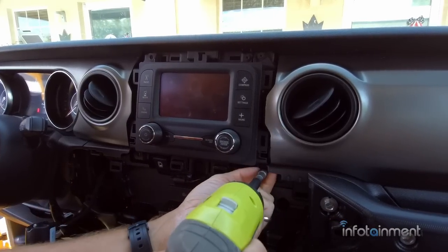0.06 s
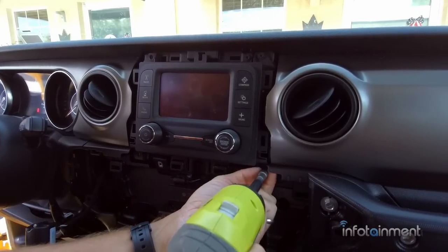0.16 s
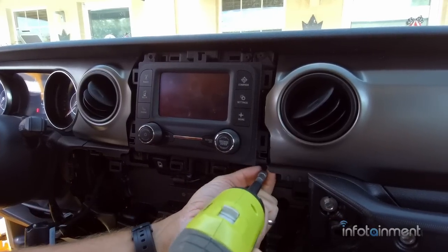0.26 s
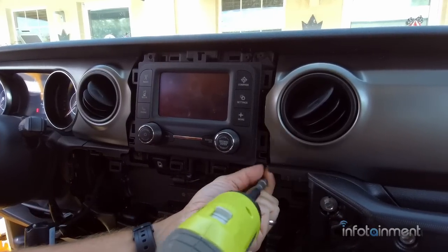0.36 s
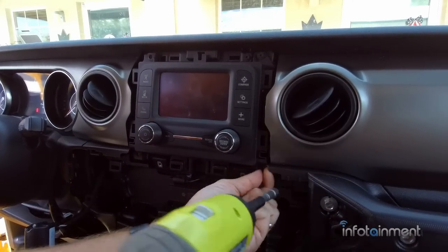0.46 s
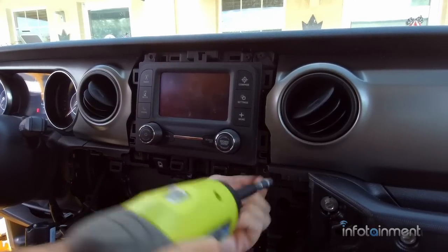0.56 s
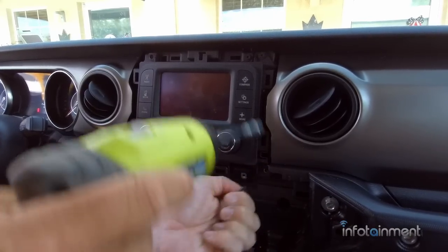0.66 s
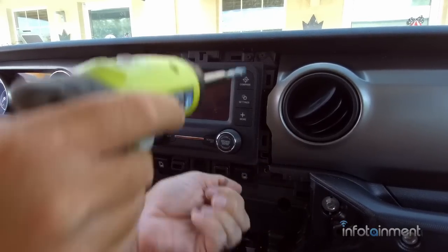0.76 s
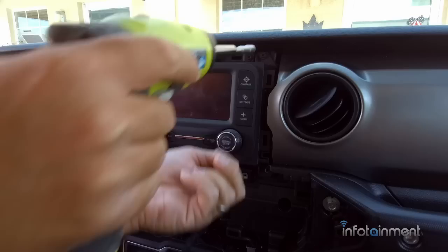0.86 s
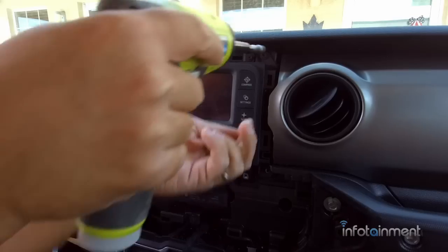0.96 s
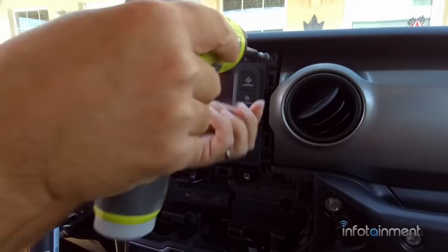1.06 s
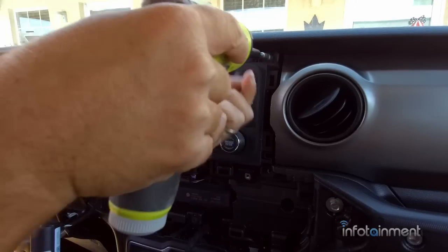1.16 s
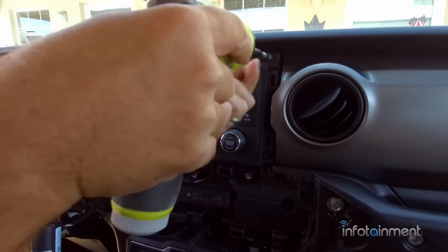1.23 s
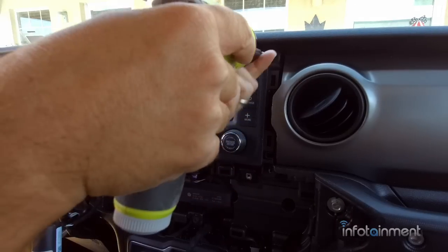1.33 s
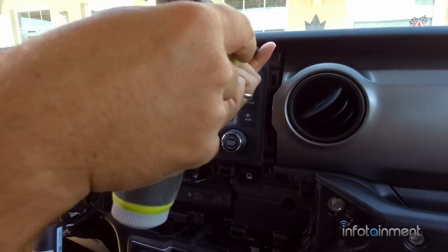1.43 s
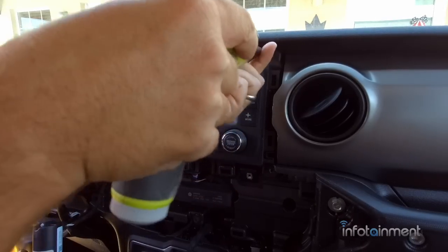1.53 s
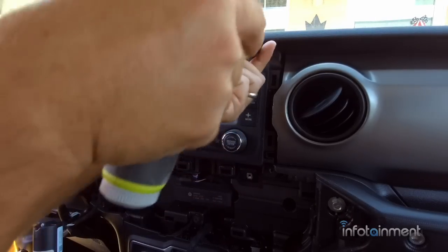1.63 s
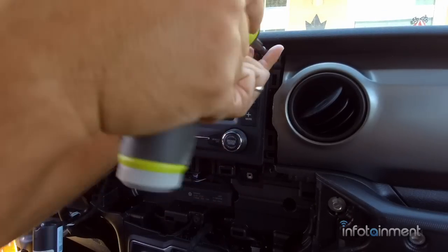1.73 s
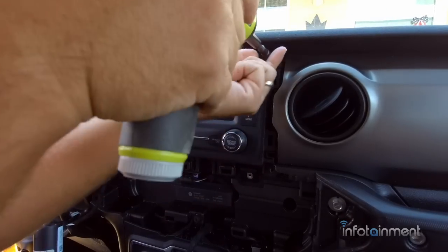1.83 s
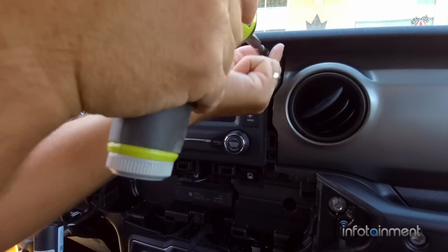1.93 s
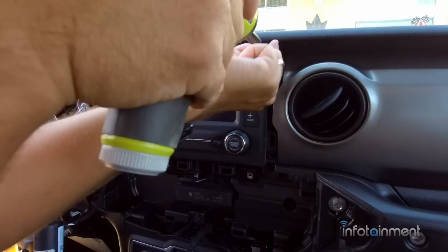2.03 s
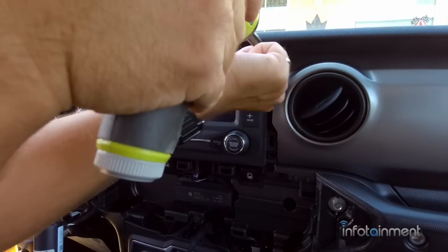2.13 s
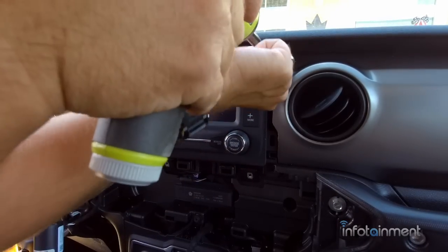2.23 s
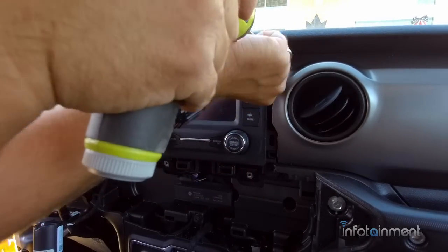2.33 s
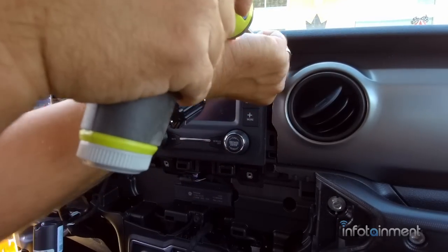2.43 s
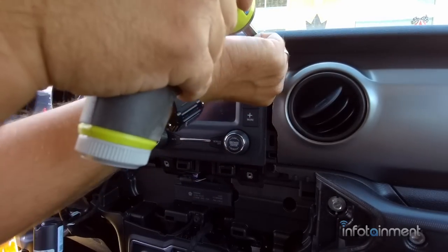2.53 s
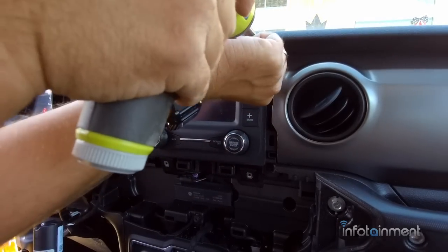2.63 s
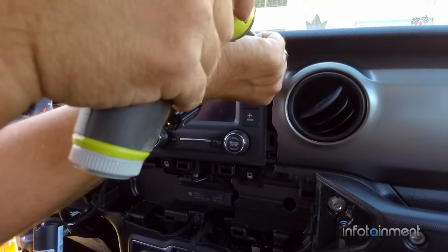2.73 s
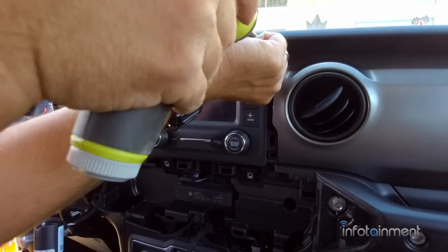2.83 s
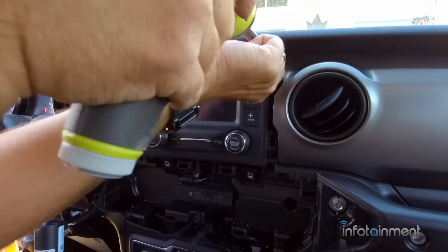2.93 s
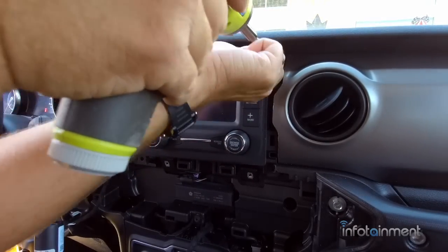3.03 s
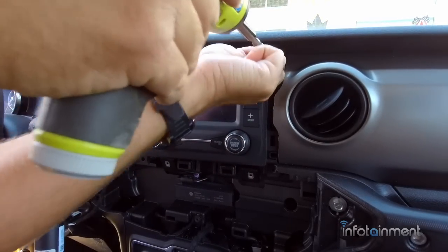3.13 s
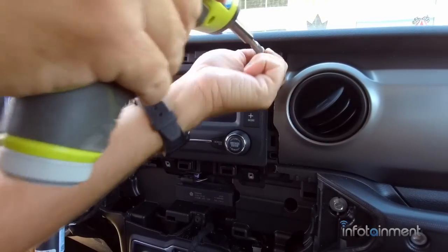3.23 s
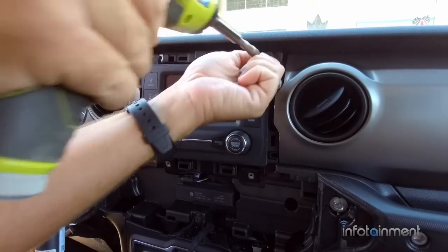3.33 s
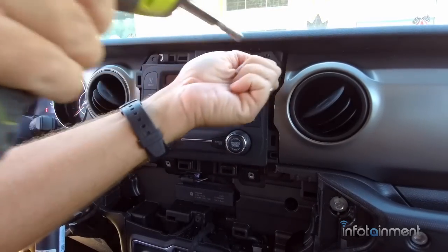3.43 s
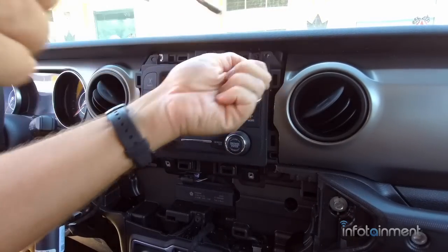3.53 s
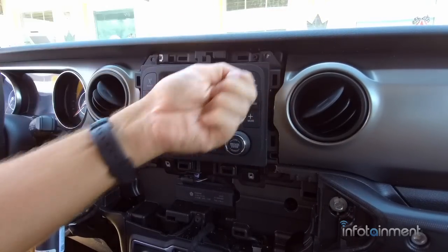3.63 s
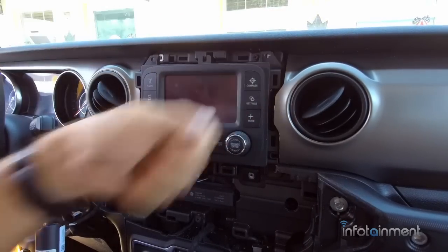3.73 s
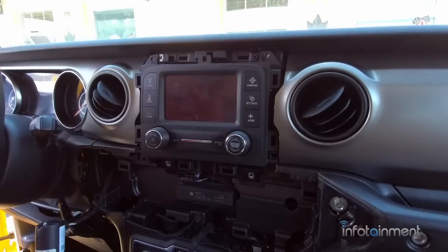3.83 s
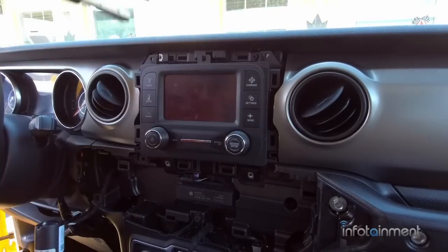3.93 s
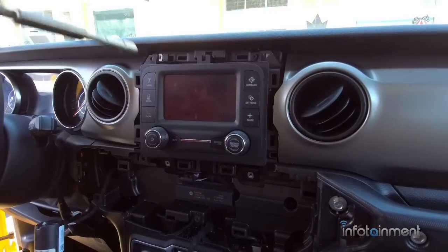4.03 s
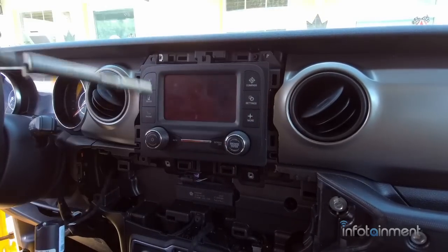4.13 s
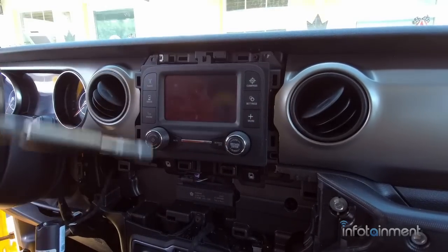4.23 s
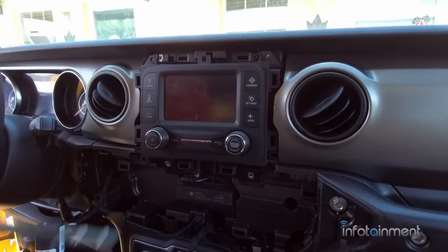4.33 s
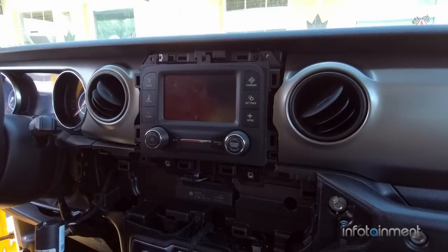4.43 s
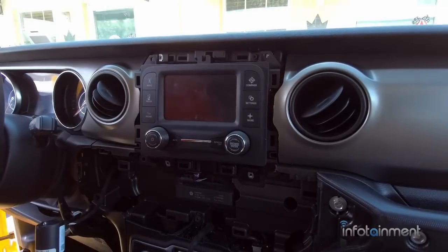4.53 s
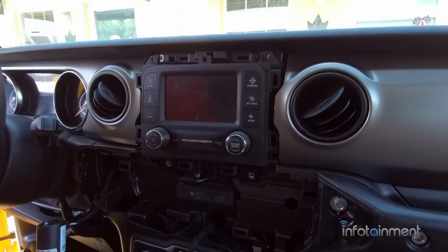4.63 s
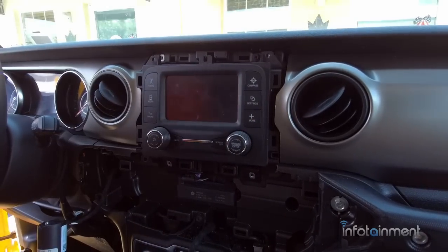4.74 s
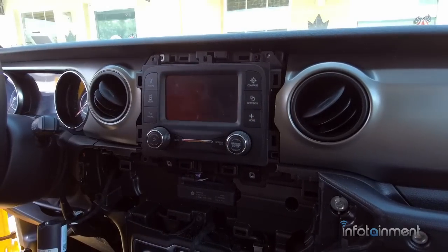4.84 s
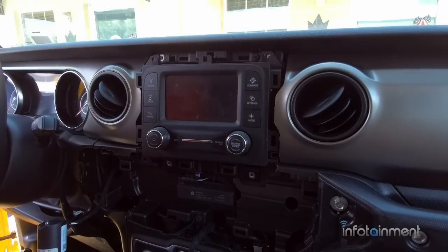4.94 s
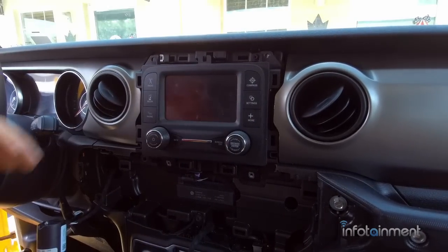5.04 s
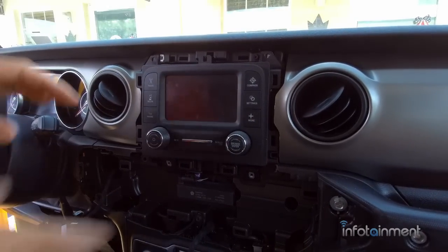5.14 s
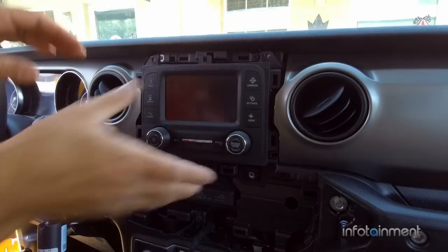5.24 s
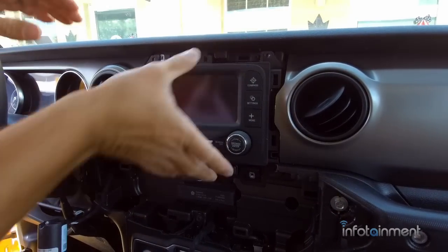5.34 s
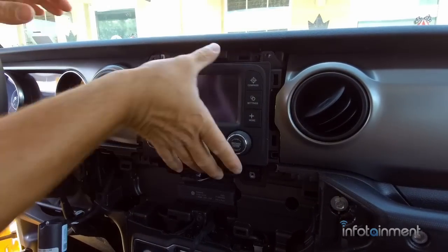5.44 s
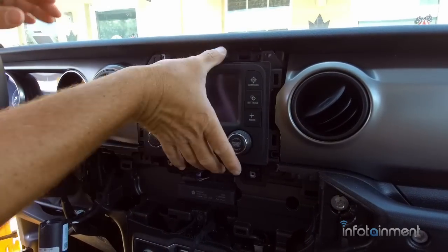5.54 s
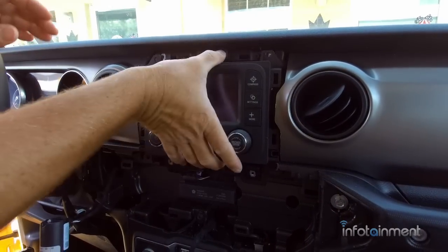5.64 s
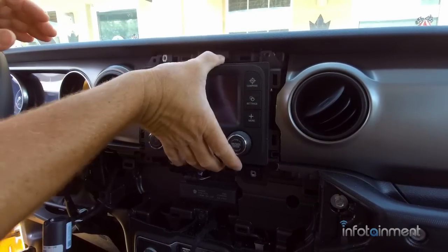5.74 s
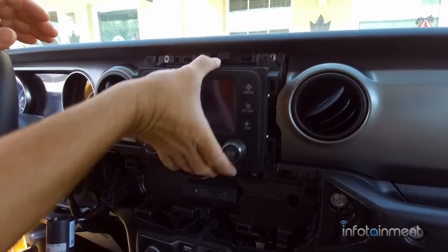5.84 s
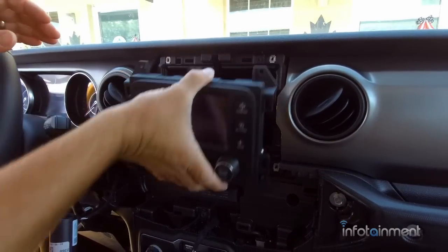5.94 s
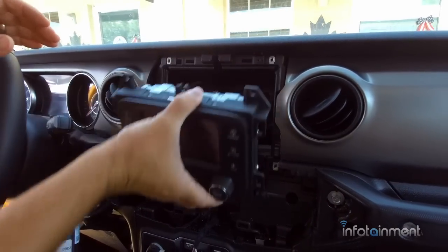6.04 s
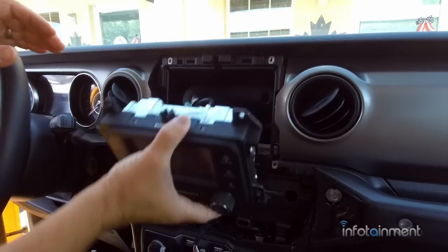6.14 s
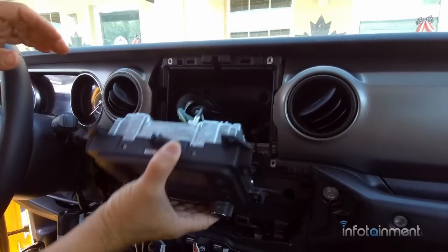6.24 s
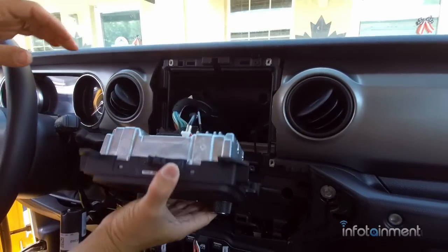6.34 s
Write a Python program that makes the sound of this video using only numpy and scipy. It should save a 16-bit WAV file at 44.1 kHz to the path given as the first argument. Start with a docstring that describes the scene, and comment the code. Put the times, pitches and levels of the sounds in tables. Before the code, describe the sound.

Inside a small, dry car cabin with faint ventilation hum, a cordless screwdriver is already whirring, then coasts down. Gritty taps and sharp plastic clacks follow. A second run backs out a screw and winds down. Tiny screw ticks, then the tool thumps loudly into a hollow console and rattles. Soft friction and small clicks close it. One close microphone, left channel only.

```python
"""In a small, dead car cabin the ventilation hums: filtered noise with a few wavering tones.
A cordless screwdriver whirrs once held free, then backs a screw out of the dashboard: uneven gear knocks and a
thin whine follow the motor speed and coast down each time. Gritty bursts of taps chatter, and the bit clacks.
The tool drops into the console with hollow thumps and rattling noise bursts; tiny ticks of screws and
soft strokes of friction join in as hands ease the radio out. One microphone feeds the left channel only."""
import sys
import numpy as np
from scipy import signal
from scipy.fft import rfft, irfft
from scipy.io import wavfile

SR = 44100
rng = np.random.default_rng(int(sys.argv[2]) if len(sys.argv) > 2 else 0)


def put_to_file(sound):
    """Save the sound as 16-bit audio at rate SR, in the file named by the first command-line argument."""
    columns = np.atleast_2d(sound).T  # one column per channel
    safe = np.clip(columns, -1, 1)
    whole_steps = np.round(safe * 32767)
    wavfile.write(sys.argv[1], SR, whole_steps.astype(np.int16))


N = 281799  # length in samples
T = np.arange(N) / SR  # time in s


def amp(db):
    """Decibels to gain."""
    return 10 ** (np.asarray(db) / 20)


def unit(x):
    """Scales to rms 1."""
    return x / np.sqrt(np.mean(x ** 2) + 1e-20)


def add(mix, start_s, sound):
    """Mixes a sound in at start_s."""
    part = mix[max(round(start_s * SR), 0):][:len(sound)]
    part += sound[:len(part)]


def drift(count, rate_hz):
    """Slow random wander of rms 1: noise that fades out above about rate_hz."""
    hz = np.fft.rfftfreq(count, 1 / SR)
    spectrum = rfft(rng.standard_normal(count)) * np.exp(-(hz / rate_hz) ** 2)
    return unit(irfft(spectrum, count))


def swells(rows, t):
    """The gain of smooth bell-shaped swells, one a row."""
    return sum(amp(db) * np.exp(-((t - middle) / half) ** 2) for middle, half, db in rows)


def colour_db(points, peaks, hz):
    """A broad spectrum with resonances standing on it."""
    point_hz, point_db = np.transpose(points)
    broad_db = np.interp(np.log(hz + 1), np.log(point_hz + 1), point_db)
    bumps = np.zeros_like(hz)
    for centre, width, level_db in peaks:
        bumps += amp(level_db) / (1 + (2 * (hz - centre) / width) ** 2)
    return broad_db + 20 * np.log10(1 + bumps)


def ring(x, points, peaks=(), bass_db=0, treble_db=0, size=4096):
    """Passes x through a causal body response, with shelves for bass and treble."""
    hz = abs(np.fft.fftfreq(size, 1 / SR))
    bass_shelf = bass_db / (1 + (hz / 600) ** 3)
    treble_shelf = treble_db * hz ** 3 / (hz ** 3 + 4500 ** 3)
    db = colour_db(points, peaks, hz) + bass_shelf + treble_shelf
    log_gain = np.log(amp(np.maximum(db, -100)))
    # minimum phase: the body answers at once and never before the blow
    response = np.fft.ifft(np.exp(np.conj(signal.hilbert(log_gain)))).real
    return signal.oaconvolve(x, response[:size // 2])[:len(x)]


def contact(level_db, t60, bass_db, treble_db, colour, peaks, rise, crack_db, tail_db, tail_t60, size=9000):
    """A crack, a dense scatter from nearby panels and a faint cabin tail; times in s."""
    t = np.arange(size) / SR
    scatter = amp(-60 * t / t60)
    crack = amp(crack_db) * np.exp(-t / 0.0012)
    tail = amp(tail_db - 60 * t / tail_t60)
    envelope = (scatter + crack + tail) * (1 - np.exp(-t / rise))
    hit = ring(envelope * rng.standard_normal(size), colour, peaks, bass_db, treble_db)
    return amp(level_db) * hit / np.sqrt(np.sum(hit ** 2) / (0.0097 * SR))  # energy as if held for 9.7 ms


# colour of the rushing air: pitch_hz, density_db (dB per Hz)
AIR_COLOUR = [(15, -10), (25, -37), (53, -32), (197, -17), (225, -6), (272, -16.5), (311, -8.5),
              (356, -11.5), (465, -5), (754, -6), (1780, -14), (2390, -18.5), (2660, -20.5), (9630, -29),
              (15200, -34.5)]
# tones of the blower and its duct: pitch_hz, width_hz, level_db (rms)
BLOWER_TONES = [(245, 13, -73.5), (444, 14, -74), (555, 35, -72), (680, 15, -76.5), (4620, 1000, -79.5)]


def ventilation(air_db=-59.15, swell_db=1.4):
    """A soft rush of air with a few tones, each wavering in level and phase."""
    air = unit(ring(rng.standard_normal(N), AIR_COLOUR, size=8192))
    out = air * amp(air_db + swell_db * drift(N, 11))
    for hz, width, level_db in BLOWER_TONES:
        phase = 2 * np.pi * hz * T
        wavering = drift(N, width / 2) * np.cos(phase) + drift(N, width / 2) * np.sin(phase)
        out += amp(level_db) * wavering
    return out


def cabin_boom(x, hz=66, width=20, gain_db=4.0):
    """Blows on the dashboard stir the lowest air mode of the cabin."""
    band = [hz - width / 2, hz + width / 2]
    return amp(gain_db) * signal.sosfilt(signal.butter(2, band, "band", fs=SR, output="sos"), x)


# strokes of hand and tool over plastic: middle_s, half_length_s, level_db
STROKES = [(1.385, 0.015, -60.5), (1.462, 0.0072, -54), (1.538, 0.013, -49.5), (3.62, 0.029, -62),
           (3.92, 0.019, -61), (4.61, 0.033, -54.5), (4.82, 0.25, -56), (5.14, 0.072, -67),
           (5.755, 0.033, -58), (6.05, 0.25, -66)]
# colour of that friction: pitch_hz, density_db (dB per Hz)
SLIDE_COLOUR = [(150, -41), (400, 4.5), (1100, -1), (2200, -1), (3500, -6), (6000, -10.5), (9000, -14),
                (15000, -19)]


def sliding(grain_db=2.0):
    """Fine, slightly uneven friction that swells and fades with each stroke."""
    grains = rng.standard_normal(N) * amp(grain_db * drift(N, 270))
    return unit(ring(grains, SLIDE_COLOUR)) * swells(STROKES, T)


# loose screws being handled: start_s, level_db, ring_hz
TICKS = [(1.06, -57.5, 13000), (1.741, -56, 2300), (3.155, -58, 6500), (3.389, -62.5, 5400),
         (4.022, -56.5, 7060), (4.053, -57, 6850), (4.126, -58, 7240), (4.213, -56.5, 4870),
         (4.267, -58, 7000), (4.288, -53, 4760)]
# colour of hard contacts, for ticks, chatter and clacks: pitch_hz, density_db (dB per Hz)
CLACK_COLOUR = [(35, -31), (60, -29), (383, -4.5), (622, -5), (1040, -3), (1500, -1), (2740, -7),
                (3080, -6), (4560, -13), (8720, -21.5), (9570, -26), (15200, -22.5)]


def ticks(t60=0.05, bass_db=-6, treble_db=30, ring_width=700, ring_db=4):
    """Small steel parts touch: short and nearly all treble."""
    out = np.zeros(N)
    for start_s, level_db, hz in TICKS:
        tick = contact(level_db, t60, bass_db, treble_db, CLACK_COLOUR, [(hz, ring_width, ring_db)],
                       rise=0.0005, crack_db=-1, tail_db=-38, tail_t60=0.112)
        add(out, start_s, tick)
    return out


# the rubber grip bouncing in the console: start_s (of the blow's centre), level_db, pitch_hz
THUMPS = [(4.1595, -34.5, 706), (4.2655, -36.5, 810), (4.3555, -22.5, 846), (4.3632, -9, 900),
          (4.379, -6.5, 910), (4.4188, -11.5, 880), (4.4326, -9.5, 960), (4.4555, -25.5, 910),
          (4.495, -34, 865), (4.513, -34.5, 794), (4.546, -32.5, 870), (4.570, -32.5, 880),
          (4.62, -39, 800)]
# echoes off the console walls: delay_s, level_db (over the blow)
WALLS = [(.0053, -9.5), (.0099, -13), (0.0154, -17.5)]
# modes of the console: pitch_hz, level_db (over the blow), t60_s
CONSOLE_MODES = [(240, -47.5, 0.29), (336, -38.5, 0.23), (423, -34, 0.29), (687, -30, 0.32),
                 (772, -15, 0.083), (920, -41, 0.14), (900, -31, 0.11), (1079, -26.5, 0.27),
                 (1565, -24, 0.049)]


def console(swell_s=0.00099, lead_s=0.0035, size=14000):
    """A soft blow is a few cycles of hollow tone, thrown back by the walls, leaving the modes ringing."""
    t = np.arange(size) / SR - lead_s
    after = np.maximum(t, 0)
    out = np.zeros(N)
    for start_s, level_db, hz in THUMPS:
        thump = np.zeros(size)
        for f, mode_db, t60 in CONSOLE_MODES:
            thump += amp(mode_db - 60 * after / t60) * np.sin(2 * np.pi * (f * after + rng.random()))
        thump *= 1 - np.exp(-after / 0.0018)  # the modes build up over a few ms
        for delay, wall_db in [(0.00031, 0)] + WALLS:  # the blow itself, then its echoes
            bell = np.exp(-0.5 * ((t - delay) / swell_s) ** 2)
            thump += amp(wall_db) * bell * np.cos(2 * np.pi * hz * (t - delay))
        add(out, start_s - lead_s, amp(level_db) * thump)
    return out


# the tool's shell landing: start_s, level_db
RATTLES = [(4.3263, -29.5), (4.338, -42.5), (4.3528, -29), (4.363, -34.5), (4.3787, -31), (4.416, -41.5),
           (4.425, -37), (4.4482, -40.5), (4.469, -47.5), (4.4934, -44.5), (4.5441, -48.5), (4.569, -43.5)]
# colour of the landing shell: pitch_hz, density_db (dB per Hz)
RATTLE_COLOUR = [(90, -36), (200, -13.5), (760, 3), (1500, -4), (2700, 0.5), (5250, -8.5), (7000, -15.5),
                 (11000, -22.5), (15200, -20)]


def rattles(t60=0.061, middling_db=-36, bass_db=3, thinning=1.0, brightening=0.27):
    """The hard shell of the tool clatters as it lands; harder blows sound thinner and brighter."""
    out = np.zeros(N)
    for start_s, level_db in RATTLES:
        force_db = level_db - middling_db
        hit = contact(level_db, t60, bass_db - thinning * force_db, brightening * force_db,
                      RATTLE_COLOUR, [(2560, 1100, -4.5)],
                      rise=0.00023, crack_db=4.5, tail_db=-27, tail_t60=0.12)
        add(out, start_s, hit)
    return out


# bursts of gritty taps and ringing, from a loose screw or the tool's shell:
# middle_s, half_length_s, level_db, ring_hz
CHATTER = [(0.276, 0.015, -35.5, 900), (.345, 0.021, -39, 1800), (0.442, 0.019, -44, 1820),
           (0.601, 0.0085, -47, 2150), (0.634, 0.0091, -39.5, 3000), (0.713, 0.0095, -43.5, 2450),
           (1.975, 0.035, -41, 720), (2.599, 0.1, -38.5, 1320), (2.84, 0.14, -51.5, 1250)]
# resonances of the dashboard, for chatter and clacks: pitch_hz, width_hz, level_db (over the contact)
DASH = [(659, 74, 7), (1050, 18, 7.5), (1301, 41, 1), (1473, 47, 1.5), (1807, 60, -4), (1920, 46, -3.5),
        (3020, 64, -2.5)]


def chatter(ring_width=160, ring_db=5, middle_hz=1000, thinning_db=9, treble_db=-8):
    """Random taps excite resonances in swelling bursts; the higher a burst rings, the less bass it has."""
    out = np.zeros(N)
    for *burst, hz in CHATTER:
        taps = rng.standard_normal(N) * (rng.random(N) < 900 / SR)  # about 900 taps a second
        bass_db = -thinning_db * np.log2(hz / middle_hz)
        peaks = DASH + [(hz, ring_width, ring_db)]
        out += swells([burst], T) * unit(ring(taps, CLACK_COLOUR, peaks, bass_db, treble_db))
    return out


# hard contacts of bit, screw and plastic: start_s, level_db, bass_db, treble_db, ring_hz (of the struck part)
CLACKS = [(0.874, -57, -12, 8, 5000), (1.2387, -34.5, 2.5, -6, 1170), (1.474, -24.5, -7.5, 5, 1250),
          (1.5476, -34.5, 3, -7, 1240), (1.643, -51.5, 2, 1, 1300), (1.7133, -46, 7, 16, 2320),
          (1.8042, -20, -20, 5.5, 1930), (1.8098, -22.5, 9, 13, 1550), (2.0396, -19, -3.5, 9.5, 1490),
          (2.371, -35, 7, -7, 1040), (2.754, -35.5, 3, -6, 930), (3.02, -53.5, -24, 10, 3600),
          (4.146, -49, 21, 15, 613), (4.155, -45.5, 18.5, 13.5, 298), (4.922, -46.5, -14, -4, 2090),
          (4.9292, -43, -40, -4, 2060), (4.9773, -48, -8, -17, 2330), (5.037, -42, -20, -1, 1610),
          (5.0599, -39, 0, 7, 1470), (6.008, -51.5, 7, 5, 625)]
CLACK_T60_S, BASS_DB_PER_DOUBLING = 0.067, 37  # a heavy, bassy contact rings longer
CRISP_HZ, TREBLE_DB_PER_OCTAVE = 9500, 28  # a soft, dull contact also stops short at the top


def clacks(ring_width=200, ring_db=7):
    """Each contact rings dashboard and struck part: the heavier, the longer; the softer, the duller."""
    out = np.zeros(N)
    for start_s, level_db, bass_db, treble_db, hz in CLACKS:
        t60 = CLACK_T60_S * 2 ** (bass_db / BASS_DB_PER_DOUBLING)
        peaks = DASH + [(hz, ring_width, ring_db)]
        hit = contact(level_db, t60, bass_db, treble_db, CLACK_COLOUR, peaks,
                      rise=0.00073, crack_db=-14, tail_db=-49, tail_t60=0.1)
        top_hz = min(CRISP_HZ * 2 ** (treble_db / TREBLE_DB_PER_OCTAVE), SR / 2 - 1000)
        add(out, start_s, signal.lfilter(*signal.butter(2, top_hz, fs=SR), hit))
    return out


# screen, windscreen and arms throw the whirr back: delay_s, gain (signed)
MIRRORS = [(.0012, 0.22), (.002, -0.17), (.00245, 0.072), (.00415, -0.16), (.0047, 0.13), (.0059, 0.027),
           (.007, 0.088)]


def mirrored(x, sway=0.03):
    """Near surfaces comb the sound; the combs shift as the hand sways."""
    t = np.arange(len(x)) / SR
    out = x.copy()
    for delay, gain in MIRRORS:
        swaying_delay = delay * (1 + sway * drift(len(x), 3.14))
        out += gain * np.interp(t - swaying_delay, t, x, left=0)
    return out


KICK, KICK_S, SPIN_UP_S = 0.56, 0.004, 0.09  # leaps to this share of top speed, then creeps up to the rest
DRAG_S = 1.3  # time constant of the drag that slows it, along with friction, once released


def motor_speed(t, on, off, top_hz, friction):
    """Share of top speed: a leap and a creep under power, then a coast against drag and friction."""
    powered = np.minimum(t, off) - on
    leap = 1 - np.exp(-powered / KICK_S)
    creep = 1 - (1 - KICK) * np.exp(-powered / SPIN_UP_S)
    brake = friction * DRAG_S / top_hz
    coast = np.exp(-np.maximum(t - off, 0) / DRAG_S)
    return np.maximum((leap * creep + brake) * coast - brake, 1e-6)


# one row a run: pressed_s, released_s, top_mesh_hz, friction (Hz per s), rattle_db,
# rattle_fall_db (per tenfold slowing), whine_db, whine_release_db (gained on release)
RUNS = [(-.5, .383, 851, 1469, -32, 14, -52.5, 6.5), (1.779, 2.598, 856, 1847, -35.5, 9.5, -47, -1)]
# whine overtones, held free and pressed to the screw: multiple (of the mesh rate), level_db
FREE_WHINE = [(1, 0), (2, -2), (3, -11), (4, -12)]
SCREW_WHINE = [(1, 0), (2, 1.5), (3, -10), (6, -12), (8, -13)]
# colour of the gear rattle in each pose: pitch_hz, density_db (dB per Hz)
FREE_COLOUR = [(60, -38.5), (250, -27.5), (480, -12.5), (700, -8.5), (980, -9), (1700, -6), (3500, -3.5),
               (6500, -5), (10000, -12), (15200, -7)]
SCREW_COLOUR = [(40, -31), (150, -27), (300, -13), (600, -10), (1800, -2.5), (4500, -5.5), (5900, -8.5),
                (7500, -11), (10500, -16), (15200, -15.5)]
# resonances of the tool's shell in each pose: pitch_hz, width_hz, level_db (over the rattle)
FREE_SHELL = [(1350, 110, 1.5), (1850, 65, 4), (2124, 240, 5.5), (2990, 125, 2.5), (4140, 130, -20),
              (4580, 84, -2), (5520, 160, 0), (6310, 90, 2), (6700, 85, -11), (6700, 61, -11),
              (13900, 1800, -5)]
SCREW_SHELL = [(1047, 51, -10), (1900, 45, 1), (2280, 52, -8), (2760, 67, -2), (3480, 51, -3),
               (3930, 80, -5), (4640, 150, -5.5), (5250, 70, -13), (5070, 110, -5), (6490, 50, 4),
               (6900, 74, -12), (7000, 55, 4), (14200, 1400, 0.5)]
KNOCKS_PER_TOOTH = 3.5  # average; the gears knock at a rate that follows speed
WHINE_FALL_DB, RELEASE_S = 66, 0.017  # whine sinks as gears slow; time for teeth to change sides on release


def screwdriver(run, overtones, colour, shell, dulling_db, swell_db, flutter, count=58000):
    """Gear teeth strike unevenly and rattle the shell; the mesh sings a thin whine. Both follow motor speed."""
    on, off, top_hz, friction, top_db, fall_db, top_whine_db, release_db = run
    t = max(on, 0) + np.arange(count) / SR
    speed = motor_speed(t, on, off, top_hz, friction)
    mesh_hz = top_hz * speed
    turns = np.cumsum(mesh_hz * (1 + flutter * drift(count, 44))) / SR  # cycles of the gear mesh

    # several planet gears mesh out of step, so the knocks come thick and irregular
    chance = KNOCKS_PER_TOOTH * np.maximum(mesh_hz, 100) / SR
    knocks = rng.standard_normal(count) * (rng.random(count) < chance) / np.sqrt(chance)
    brushes = rng.standard_normal(count) * (1 + 0.28 * np.cos(2 * np.pi * turns))
    # flaws of the gears repeat with every turn of the shaft: a comb of lines that glides with speed
    flaws = np.zeros(count)
    for k in range(4, 28):
        flaws += rng.rayleigh() * np.cos(2 * np.pi * (k * turns / 3 + rng.random()))
    flaws = unit(flaws * np.sqrt(speed))
    strikes = 0.63 * knocks + 0.89 * brushes + amp(-9) / 2 * flaws
    rattle = unit(mirrored(ring(strikes, colour, shell)))

    # slower teeth strike more softly: the top of the sound fades first
    dull = signal.lfilter(*signal.butter(1, 4500, fs=SR), rattle)
    rattle = dull + (rattle - dull) * amp(-dulling_db * (1 - speed))
    rattle *= amp(top_db + fall_db * np.log10(speed) + swell_db * drift(count, 44))

    coasting = 1 - np.exp(-np.maximum(t - off, 0) / RELEASE_S)
    whine_db = top_whine_db + release_db * coasting - WHINE_FALL_DB * (1 - speed) ** 2
    whine = np.zeros(count)
    for k, db in overtones:
        whine += amp(db + 1.5 * drift(count, 14)) * np.sin(2 * np.pi * (k * turns + rng.random()))
    out = np.zeros(N)
    add(out, t[0], rattle + amp(whine_db) * whine)
    return out


def scene():
    """All sources at one microphone, on the left channel."""
    free = screwdriver(RUNS[0], FREE_WHINE, FREE_COLOUR, FREE_SHELL,
                       dulling_db=11.5, swell_db=1.16, flutter=0.00655)
    unscrewing = screwdriver(RUNS[1], SCREW_WHINE, SCREW_COLOUR, SCREW_SHELL,
                             dulling_db=8, swell_db=0.2, flutter=0.0015)
    dashboard = unscrewing + chatter() + clacks()
    background = ventilation() + cabin_boom(dashboard)
    handling = sliding() + ticks() + console() + rattles()
    mono = background + handling + dashboard + free
    return np.array([2 * mono, np.zeros(N)])  # doubling lifts every source level by 6 dB


def record(dry, ceiling=0.96, edge_hz=15330):
    """Clips hard at the full-scale limit, then cuts the treble above edge_hz."""
    clipped = np.clip(dry, -ceiling, ceiling)
    lowpass = signal.firwin(1023, edge_hz, window=("kaiser", 9), fs=SR)
    return signal.oaconvolve(clipped, lowpass[None], "same", axes=1)


dry = scene()
out = record(dry)
put_to_file(out)
```